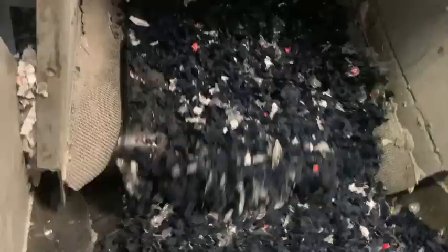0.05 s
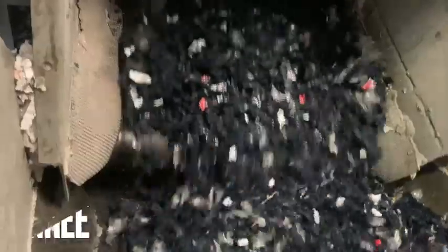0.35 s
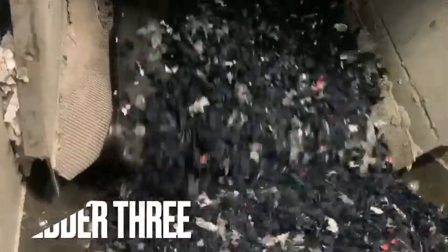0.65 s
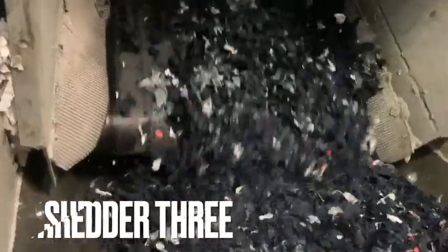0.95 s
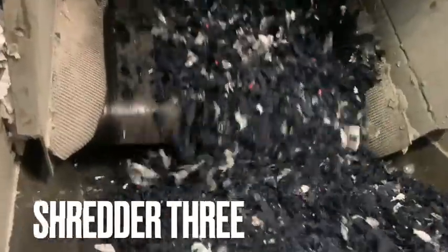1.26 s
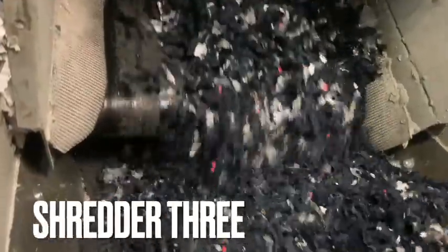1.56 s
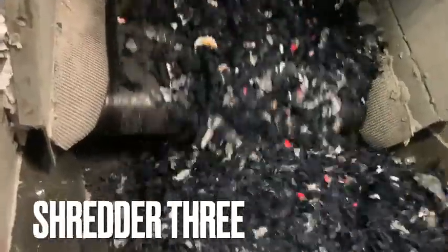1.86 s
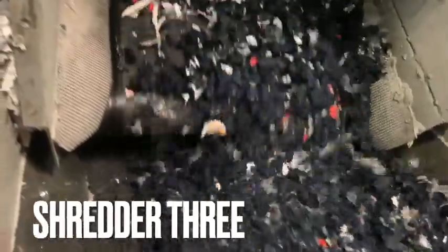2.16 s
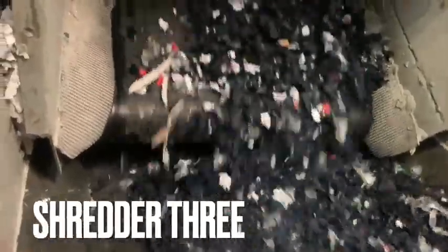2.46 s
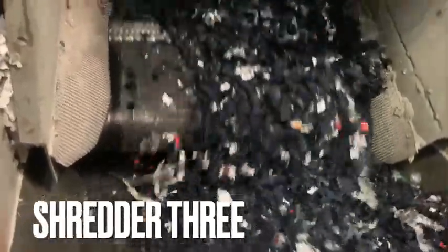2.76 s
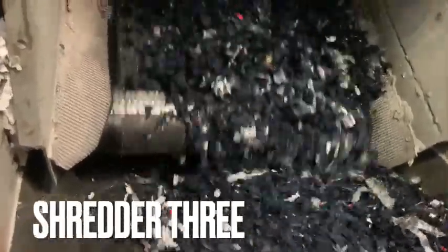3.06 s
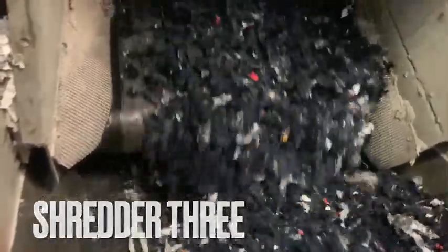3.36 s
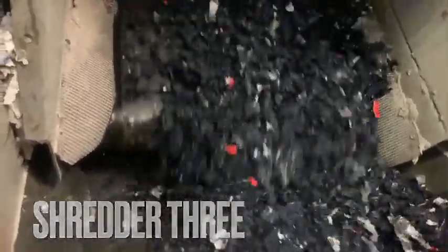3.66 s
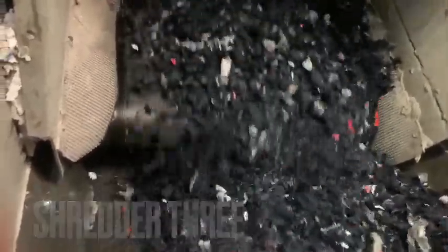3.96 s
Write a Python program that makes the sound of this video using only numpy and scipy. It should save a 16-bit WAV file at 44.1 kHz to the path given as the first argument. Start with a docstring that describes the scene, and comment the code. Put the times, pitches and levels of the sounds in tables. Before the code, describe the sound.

An industrial shredder rumbles steadily while scrap chips patter and rattle onto a pile.

```python
"""In a plant, an industrial shredder runs steadily while a conveyor tips scrap onto a pile.
Tumbling load rumbles in the cutting chamber, the drives hum, and lumps knock on the housing.
Countless chips patter and rustle close by and rattle on the chute. Now and then a hard piece
clacks on the chute or thin scrap crinkles. Later, scrap scraping on sheet metal swells faintly."""
import sys
import numpy as np
from scipy import signal
from scipy.fft import rfft, irfft
from scipy.io import wavfile

SR = 44100
rng = np.random.default_rng(int(sys.argv[2]) if len(sys.argv) > 2 else 0)


def unload_audio(sound):
    """Save the sound as a 16-bit wav file, at the path given as the first command line argument."""
    columns = np.transpose(np.atleast_2d(sound))
    # keep every value between -1 and 1, then stretch to whole-number steps
    steps = np.round(np.clip(columns, -1, 1) * 32767)
    wavfile.write(sys.argv[1], SR, steps.astype(np.int16))


N = 176400
T, HZ = np.arange(N) / SR, np.fft.rfftfreq(N, 1 / SR)
HIT_T, HIT_HZ = T[:SR // 8], np.fft.rfftfreq(SR // 8, 1 / SR)  # axes of one impact

# Chamber rumble. Each row: frequency in Hz, relative density in dB.
RUMBLE_SPECTRUM = [(15, -38), (32, -34), (42, -28), (52, -10), (62, -4.5), (85, -2.5), (108, -4.5),
                   (122, -8.5), (142, -13), (165, -18), (185, -13.5), (230, -14.5), (270, -14),
                   (320, -16.5), (390, -18), (440, -23.5), (560, -21.5), (700, -25.5), (900, -31.5),
                   (1500, -37.5), (5000, -49.5), (16000, -74)]
# Shredder load, then churning above the boom. Each row: time in seconds, gain in dB.
LOAD_CURVE = [(0, -4.5), (.3, -0.8), (1, -1.8), (1.6, -1.2), (2, 2.2), (2.6, 0), (3.3, 0), (4, 1.5)]
CHURN_CURVE = [(0, 0), (.4, -0.4), (1, 0.5), (1.7, -1), (2.4, 0.2), (3.2, 0.1), (4, 2.5)]
# Mains hum, then drive hum. Each row: time in seconds, level in dB.
MAINS_CURVE = [(0, -32), (.35, -27), (.75, -22), (1.1, -29), (1.6, -24), (2.6, -23), (3.05, -15.5),
               (3.6, -18.5), (4, -21)]
DRIVE_CURVE = [(0, -35), (.45, -30), (1.2, -35), (2.05, -25), (3, -30), (4, -30)]
# Motor hums. Each row: pitch in Hz, level in dB at 0 dB load, rms waver in Hz.
MOTOR_TONES = [(49.8, -40, .3), (182.9, -38, .6), (338.4, -39, .4)]
# Gear whine. Each row: pitch in Hz, level in dB.
GEAR_TONES = [(455.5, -40), (513, -42.5), (778, -44), (957.2, -47.5), (1077, -47.5)]
# Chip patter, then rustle of thin shreds. Each row: frequency in Hz, relative gain in dB.
PATTER_SPECTRUM = [(300, -44), (700, -31), (900, -27.5), (1150, -31), (1300, -26), (1480, -29), (1780, -28),
                   (1920, -31.5), (2200, -33.5), (2450, -31.5), (2750, -33), (3100, -31), (3400, -37),
                   (3850, -34.5), (4250, -37), (4750, -34.5), (5150, -45), (8000, -40), (16000, -56)]
RUSTLE_SPECTRUM = [(5000, -40.5), (6500, -40), (7200, -42), (7800, -41.5), (8300, -39), (8800, -45),
                   (10500, -46), (11300, -51), (12700, -50.7), (14000, -54.7), (16000, -54.5)]
# Patter and rattle, then rustle. Each row: time in seconds, gain in dB.
PATTER_CURVE = [(0, -5), (.06, -8), (.13, 0), (.38, 1.5), (.55, -.5), (1.1, 0.3), (1.42, -1), (1.8, -0.7),
                (2.3, -1.8), (2.5, 0), (2.68, 0), (2.82, 0), (3.15, -0.2), (3.4, 1), (3.75, 1.5), (4, -0.5)]
RUSTLE_CURVE = [(0, -7), (.07, -7.5), (.11, -2), (.48, 0), (.57, -2), (.65, 3), (.73, -0.5), (.93, -2),
                (1.13, 1), (1.42, -2.5), (1.56, 1), (1.85, 1.8), (2, -2), (2.3, -1.3), (2.55, -0.5),
                (2.7, -1), (2.86, 2), (3.03, 0), (3.2, -2), (3.37, 3), (3.47, -0.5), (3.75, 1), (4, -1)]
# Chute resonances. Each row: frequency in Hz, gain in dB, T60 in seconds.
CHUTE_MODES = [(1270, -3, .07), (1700, -3, .06), (1800, -5, .07), (2153, -6, .06), (2420, -5, .08),
               (2756, -1, .067), (3085, -5, .06), (3950, -4, .055), (4640, -4, .04), (4764, -2, .035)]
# Lumps on the housing. Each row: start in seconds, gain in dB, pitch in Hz.
KNOCK_HITS = [(.07, -13, 265), (.345, -12, 270), (.375, -11, 265), (.44, -13, 275), (.568, -12, 256),
              (.66, -13, 340), (.85, -11, 280), (1.025, -14, 334), (1.47, -13, 265), (1.535, -12, 260),
              (1.68, -13, 272), (1.728, -12, 258), (1.915, -13, 240), (2.02, -12, 255), (2.075, -11, 264),
              (2.31, -15, 320), (2.535, -12, 255), (2.70, -14, 270), (3.135, -14, 310), (3.27, -10, 269),
              (3.651, -13, 280), (3.752, -7.5, 255)]
# Housing resonances. Each row: ratio to the knock's pitch, gain in dB, T60 in seconds.
HOUSING_MODES = [(1, 2, .14), (1.17, -4, .1), (1.46, -4, .09), (2.15, -9, .07)]
# Hard pieces on the chute. Each row: start in seconds, gain in dB, centre in Hz, spread in octaves.
CLACK_HITS = [(.1925, -15.5, 1260, .25), (.1935, -12.5, 2700, .19), (.1965, -19, 3800, .5),
              (.204, -24, 2750, .15), (.294, -22, 1260, .5), (.345, -22, 2000, .8), (.400, -19.5, 2200, .7),
              (.6494, -18, 1600, 1), (.784, -22, 1300, .6), (.840, -22, 1650, .4), (1.0096, -21, 2400, .8),
              (1.0794, -20.5, 2600, 1), (1.110, -22.5, 1900, .5), (1.2615, -23, 2000, 1),
              (1.348, -22, 1750, .4), (1.356, -24, 3900, .4), (1.432, -23, 1790, .4),
              (2.1111, -23, 1800, 1), (2.7825, -20, 2800, .7), (2.8135, -19.5, 2500, .7),
              (2.830, -20, 1700, .5), (2.9031, -11.5, 4400, .22), (2.9036, -12.5, 2600, .7),
              (2.9145, -23, 3400, .8), (2.975, -24, 4000, .6), (3.3134, -21, 1350, .6),
              (3.7414, -21, 2800, .7), (3.927, -22, 1700, .8)]
# Thin scrap crumpling. Each row: start in seconds, gain in dB, decay in seconds, centre in Hz.
CRINKLE_BURSTS = [(.193, -26, .005, 7400), (0.449, -22.5, .005, 7200), (.4813, -26, .003, 6600),
                  (.6095, -30, .003, 6800), (.632, -27, .006, 7500), (.665, -25, .004, 7000),
                  (1.0056, -25, .004, 6400), (1.079, -20.5, 0.0037, 6000), (1.143, -22, .008, 7960),
                  (1.160, -22, .004, 6500), (1.261, -22.5, .004, 6600), (1.349, -29, 0.0073, 10000),
                  (1.787, -23, .0034, 7600), (1.8103, -26, .004, 8300), (1.8537, -23, .005, 7200),
                  (1.9624, -26, .003, 7500), (2.071, -27, .004, 11500), (2.362, -26, .003, 6600),
                  (2.812, -24, .003, 6400), (2.8634, -24.5, .004, 7700), (2.877, -27, .005, 10500),
                  (2.902, -24, .005, 7000), (3.760, -24, .003, 7800)]
# Rubbed sheet metal. Each row: resonance in Hz, half-width in Hz, relative gain in dB.
SHEET_MODES = [(2410, 65, 0), (3170, 150, -6), (4610, 130, -7), (6573, 90, -10)]
# Scraping. Each row: time in seconds, level in dB.
SCRAPE_CURVE = [(0, -45), (2.3, -45), (2.48, -34), (2.65, -32), (2.8, -35), (3, -36), (3.5, -38), (4, -39)]
# Stereo image. Each row: frequency in Hz, coherence 0-1, left lead in radians, left over right in dB.
STEREO_IMAGE = [(60, .99, 0, -3), (200, 0.96, 0, 0), (288, 0.98, 0.5, 0), (337, 0.46, .5, 4),
                (448, 0.76, 0.33, 0), (664, 0.64, -0.55, -0.4), (970, 0, 0.5, 2), (1190, 0.4, 0.5, 2),
                (1470, 0.03, -1.5, 2.5), (1990, 0.25, -1.4, 1.5), (2360, 0.2, 0, 1), (2823, 0.6, 3, 1.5),
                (3430, .28, 2, 6.5), (3790, 0.17, 4.5, 3.5), (4630, 0.13, 7, 3), (5170, 0.14, 8.5, -1),
                (5960, 0.4, 7.8, 2), (6940, 0.97, 6, -1.5), (8060, 0.73, 4.9, 2.5), (8400, 1, 3.5, -3),
                (9510, 1, 3, -0.5), (10280, 0.75, 1.26, -0.5), (11200, 0.9, 0.7, -1), (12400, .6, -.7, 1),
                (13200, .99, -3.7, 0), (14200, .99, -3.3, 0), (14800, .6, -5.7, 0), (15600, .9, -5.5, 0)]


def amp(db):
    """Decibels to gain."""
    return 10 ** (np.asarray(db) / 20)


def unit(x):
    """Scales to rms 1."""
    return x / np.sqrt(np.mean(x ** 2) + 1e-20)


def by_hz(table, column=1):
    """Interpolates a table column over log frequency."""
    rows = np.array(table)
    return np.interp(np.log(HZ + 1), np.log(rows[:, 0] + 1), rows[:, column])


def level(curve):
    """Gain over time from a dB curve."""
    return amp(np.interp(T, *np.transpose(curve)))


def colour(x, gain):
    """Filters by a gain per frequency."""
    return irfft(rfft(x) * gain, x.shape[-1])


def bell(hz, centre_hz, octaves):
    """Gaussian hump over log frequency."""
    return np.exp(-.5 * (np.log2((hz + 1) / centre_hz) / octaves) ** 2)


def drift(rate_hz):
    """Slow noise of rms 1."""
    return unit(colour(rng.standard_normal(N), np.exp(-(HZ / rate_hz) ** 2) * (HZ > 0)))


def add(mix, start_s, sound):
    """Mixes a sound in at a time."""
    part = mix[:, max(round(start_s * SR), 0):][:, :sound.shape[1]]
    part += sound[:, :part.shape[1]]


def mode(hz, db, t60_s):
    """One decaying resonance, random phase per channel."""
    return amp(db - 60 * HIT_T / t60_s) * np.sin(2 * np.pi * (hz * HIT_T + rng.random((2, 1))))


def strikes(per_s, spread_db, max_spreads):
    """Random impulses: most small, a few much larger."""
    struck = rng.random(N) < per_s / SR
    return struck * amp(spread_db * np.minimum(rng.exponential(1, N), max_spreads))


def rumble(gain_db=-14.5, split_hz=160, shake_hz=28.8, lump_db=1.6):
    """Tumbling load booms in the steadily shaking housing and churns unevenly higher up."""
    roar = unit(colour(rng.standard_normal((2, N)), amp(by_hz(RUMBLE_SPECTRUM))))
    boom = colour(roar, 1 / (1 + (HZ / split_hz) ** 8))
    shake = 1 + .18 * np.sin(2 * np.pi * shake_hz * T)
    churn = level(CHURN_CURVE) * amp(lump_db * drift(rate_hz=11.8)) * (roar - boom)
    return amp(gain_db) * (level(LOAD_CURVE) * shake * boom + churn)


def tone(hz, db=0, waver_hz=.3, waver_db=2.2):
    """Sine wavering in pitch and level."""
    turns = np.cumsum(hz + waver_hz * drift(rate_hz=3.3)) / SR + rng.random()
    return amp(db) * unit(amp(waver_db * drift(rate_hz=3)) * np.sin(2 * np.pi * turns))


def hum(mains_hz=100.4, drive_hz=256.3):
    """Mains and drive hums swell and ebb; weaker motor hums follow the load; gears whine."""
    mains = level(MAINS_CURVE) * tone(mains_hz, waver_db=.7)
    drive = level(DRIVE_CURVE) * tone(drive_hz, waver_db=.7)
    motors = level(LOAD_CURVE) * sum(tone(*row) for row in MOTOR_TONES)
    gears = sum(tone(hz, db) for hz, db in GEAR_TONES)
    return mains + drive + motors + gears


def chip_power(tick_s=.00092, echo_s=.008, echo_share=.45):
    """Power envelope of a hail of chips, mean 1: each a quick tick with a short echo."""
    energy = strikes(per_s=900, spread_db=3, max_spreads=4.5) ** 2
    tick = (1 - echo_share) * np.exp(-HIT_T / tick_s) / tick_s
    echo = echo_share * np.exp(-HIT_T / echo_s) / echo_s
    power = abs(signal.fftconvolve(energy, tick + echo)[:N])
    return power / np.mean(power)


def falling_scrap(patter_db=-27.5, rustle_db=-35, split_hz=4850, clump_db=1.43, rotor_hz=24.46):
    """Chips land in clumps: large ones patter, throbbing with the rotor; thin ones rustle."""
    shared_power, ticks = chip_power(), 0
    size_bands = np.array([bell(HZ, hz, octaves=.5) for hz in np.geomspace(800, 13000, 6)]) + 1e-9
    for band in size_bands / np.linalg.norm(size_bands, axis=0):
        hail = np.sqrt(.5 * shared_power + .5 * chip_power())
        clumps = amp(clump_db * drift(rate_hz=11.6))
        ticks += colour(rng.standard_normal((2, N)) * hail * clumps, band)
    lowpass = 1 / (1 + (HZ / split_hz) ** 8)
    throb = 1 + .074 * (np.sin(2 * np.pi * rotor_hz * T) + np.sin(4 * np.pi * rotor_hz * T))
    patter = level(PATTER_CURVE) * unit(colour(ticks, amp(by_hz(PATTER_SPECTRUM)) * lowpass))
    rustle = level(RUSTLE_CURVE) * unit(colour(ticks, amp(by_hz(RUSTLE_SPECTRUM)) * (1 - lowpass)))
    return amp(patter_db) * throb * patter + amp(rustle_db) * rustle


def rattle(gain_db=-36.3):
    """Small hard chips keep striking the chute, each ringing one mode."""
    out = 0
    for hz, db, t60_s in CHUTE_MODES:
        hits = strikes(per_s=30, spread_db=4, max_spreads=3)
        ring = signal.oaconvolve(hits[None], mode(hz, db, t60_s), axes=1)[:, :N]
        out += bell(hz, centre_hz=1900, octaves=.55) * ring
    return amp(gain_db) * level(PATTER_CURVE) * unit(out)


def knocks(rise_s=.006):
    """Heavy lumps thud on the housing, ringing it at varying pitch."""
    out = np.zeros((2, N))
    attack = 1 - np.exp(-HIT_T / rise_s)
    for start_s, db, hz in KNOCK_HITS:
        ring = sum(mode(hz * ratio, mode_db, t60_s) for ratio, mode_db, t60_s in HOUSING_MODES)
        add(out, start_s, amp(db) * attack * ring)
    return out


def clacks(rise_s=.00039, decay_s=.0037, top_hz=5100, ring_db=-4.5):
    """Hard pieces crack on the chute, ringing the modes near each crack's centre frequency."""
    out = np.zeros((2, N))
    attack = 1 - np.exp(-HIT_T / rise_s)
    for start_s, db, centre_hz, octaves in CLACK_HITS:
        band = bell(HIT_HZ, centre_hz, octaves) / (1 + (HIT_HZ / top_hz) ** 20)
        crack = unit(colour(rng.standard_normal((2, len(HIT_T))), band)) * np.exp(-HIT_T / decay_s)
        ring = sum(bell(hz, centre_hz, octaves) * mode(hz, mode_db, t60_s)
                   for hz, mode_db, t60_s in CHUTE_MODES)
        add(out, start_s, amp(db) * attack * (crack + amp(ring_db) * ring))
    return out


def crinkles(rise_s=.00075):
    """Thin scrap crumples in short, bright noise bursts."""
    out = np.zeros((2, N))
    attack = 1 - np.exp(-HIT_T / rise_s)
    for start_s, db, decay_s, centre_hz in CRINKLE_BURSTS:
        band = bell(HIT_HZ, centre_hz, octaves=.44)
        fizz = unit(colour(rng.standard_normal((2, len(HIT_T))), band))
        add(out, start_s, amp(db) * attack * fizz * np.exp(-HIT_T / decay_s))
    return out


def scraping():
    """Tiny slips of scrap along sheet metal keep it ringing."""
    slips = rng.standard_normal((2, N)) * np.sqrt(chip_power())
    metal = sum(amp(db) / (1 + 1j * (HZ - hz) / half_width_hz) ** 2
                for hz, half_width_hz, db in SHEET_MODES)
    return level(SCRAPE_CURVE) * unit(colour(slips, metal))


def stereo_image(x):
    """Bass alike in both channels; treble offset, nearly opposite in phase around 9 and 14 kHz."""
    first, second = rfft(x)
    coherence, lead_rad, balance_db = (by_hz(STEREO_IMAGE, column) for column in (1, 2, 3))
    coherence = np.clip(coherence, 0, 1)
    blend = coherence * first + np.sqrt(1 - coherence ** 2) * second
    left = first * amp(balance_db / 2)
    right = blend * np.exp(-1j * lead_rad) * amp(-balance_db / 2)
    return irfft(np.array([left, right]), N)


def scene():
    """Shredder and scrap from beside the conveyor; hum centred."""
    noises = rumble() + knocks() + falling_scrap() + rattle() + scraping() + clacks() + crinkles()
    return stereo_image(noises) + hum()


def record(dry, knee=6, cutoff_hz=15950):
    """Soft clip at full scale, then low-pass."""
    rounded = dry / (1 + abs(dry) ** knee) ** (1 / knee)
    lowpass = signal.firwin(511, cutoff_hz, window=("kaiser", 9), fs=SR)
    return signal.oaconvolve(rounded, lowpass[None], "same")


dry = scene()
out = record(dry)
unload_audio(out)
```